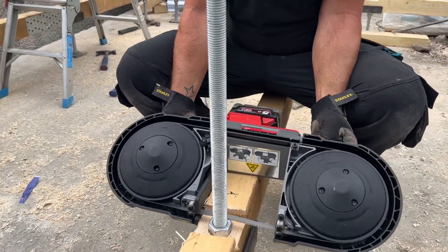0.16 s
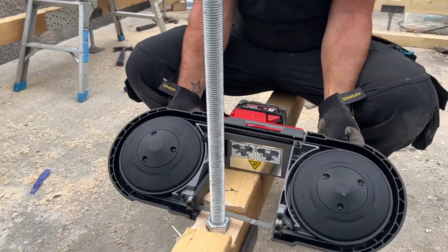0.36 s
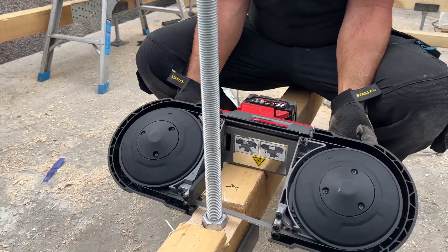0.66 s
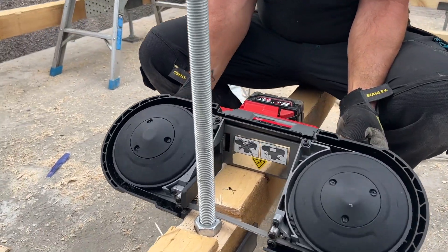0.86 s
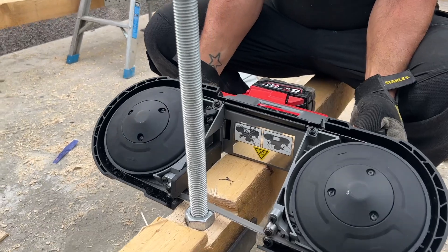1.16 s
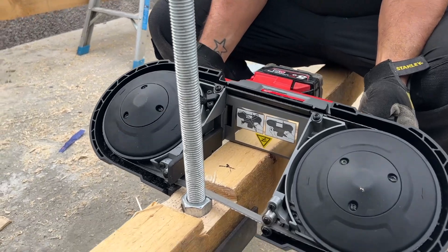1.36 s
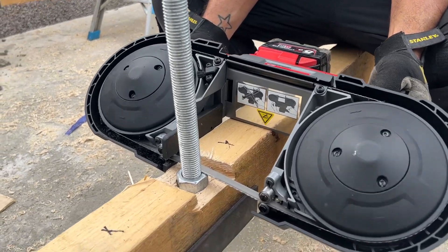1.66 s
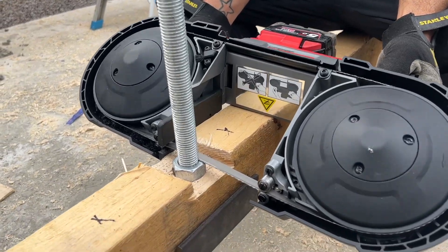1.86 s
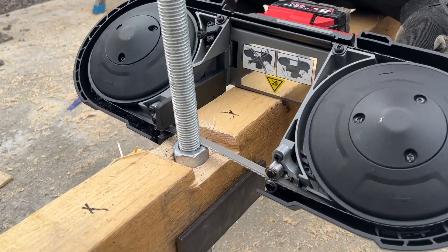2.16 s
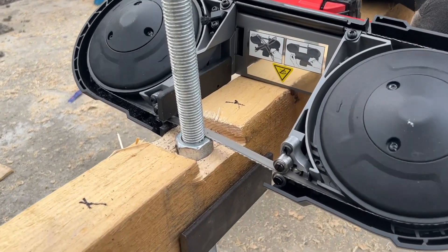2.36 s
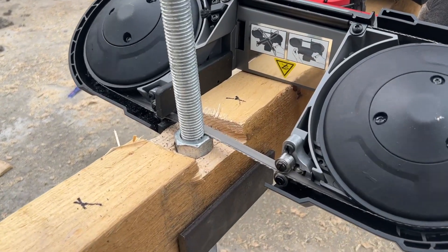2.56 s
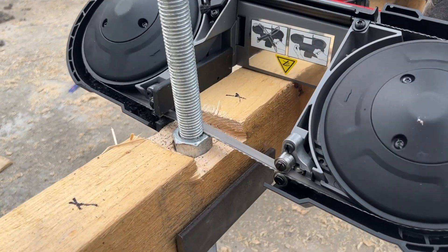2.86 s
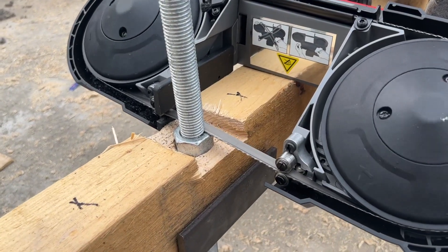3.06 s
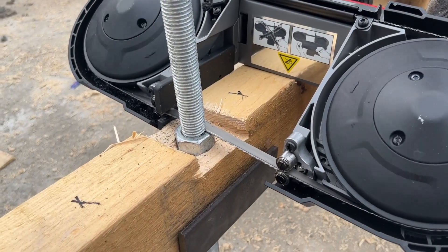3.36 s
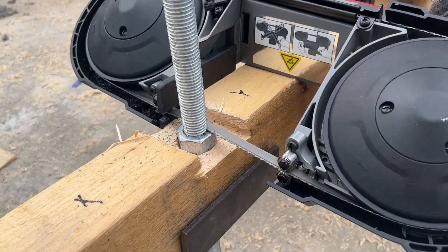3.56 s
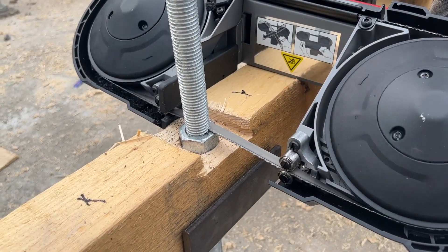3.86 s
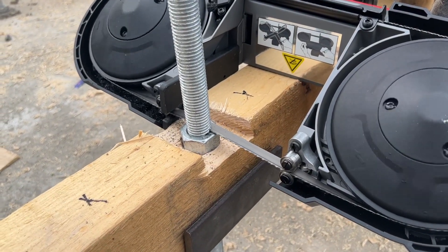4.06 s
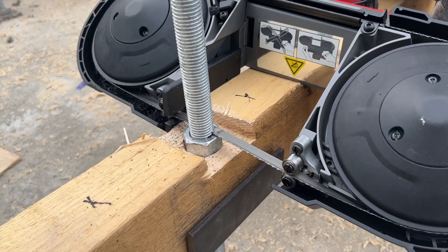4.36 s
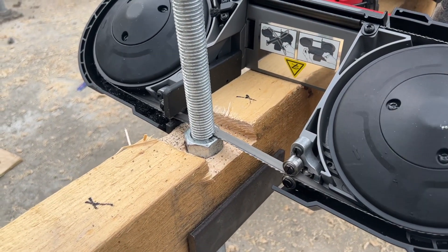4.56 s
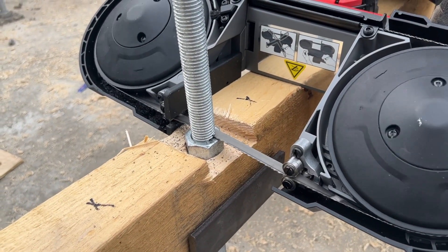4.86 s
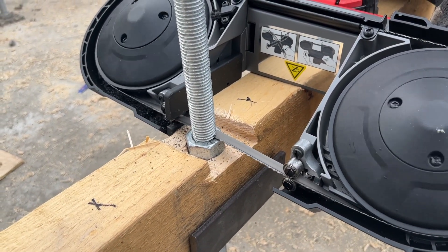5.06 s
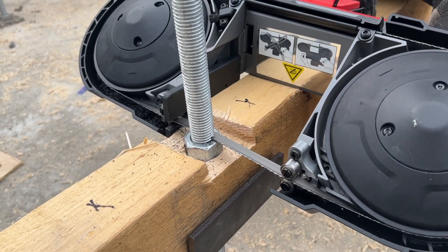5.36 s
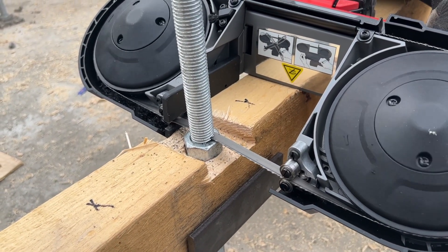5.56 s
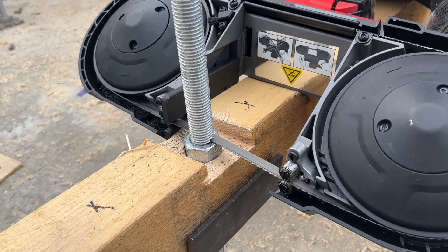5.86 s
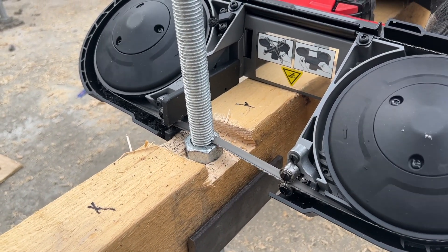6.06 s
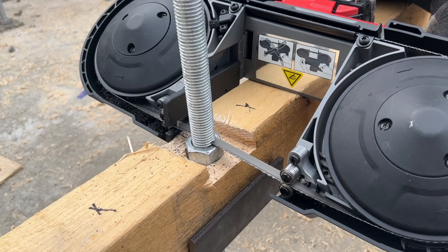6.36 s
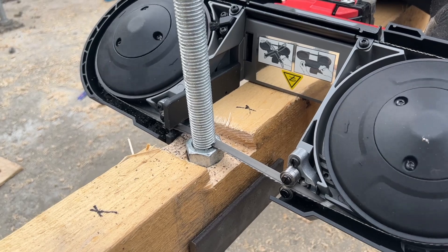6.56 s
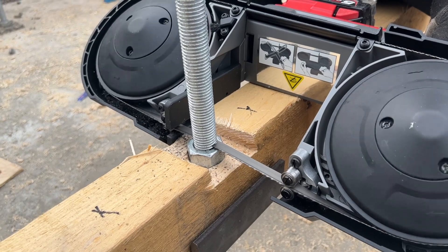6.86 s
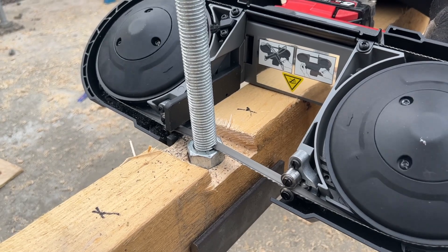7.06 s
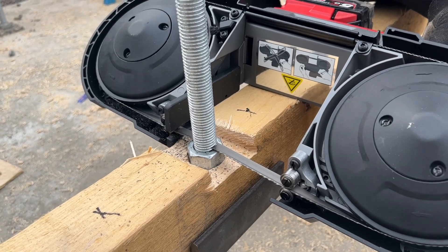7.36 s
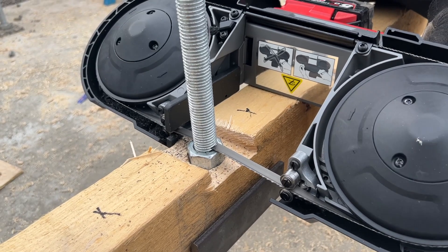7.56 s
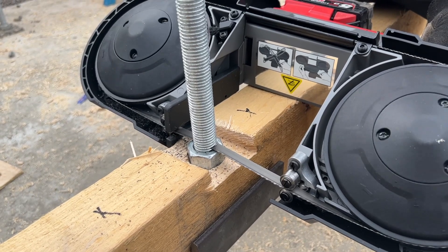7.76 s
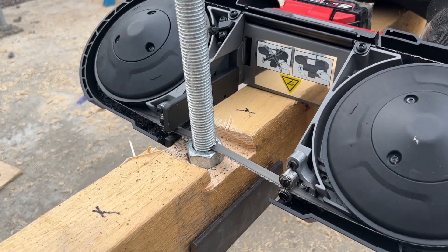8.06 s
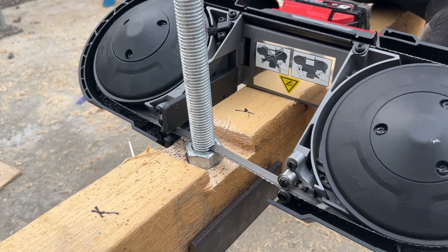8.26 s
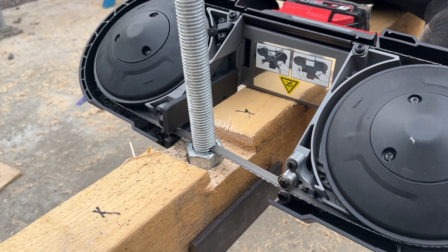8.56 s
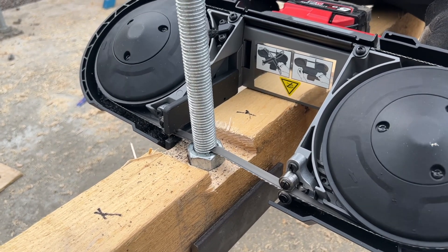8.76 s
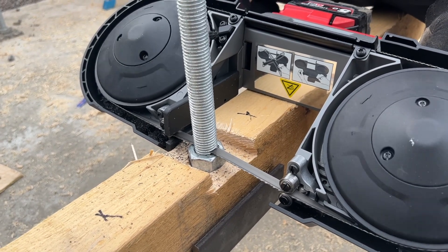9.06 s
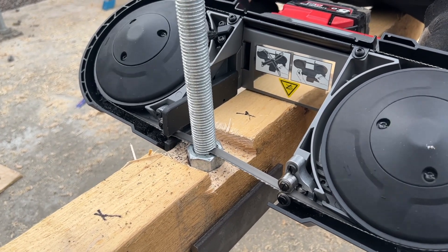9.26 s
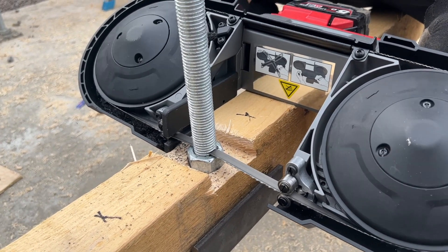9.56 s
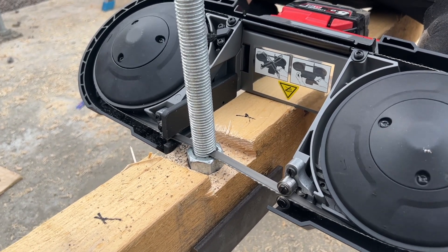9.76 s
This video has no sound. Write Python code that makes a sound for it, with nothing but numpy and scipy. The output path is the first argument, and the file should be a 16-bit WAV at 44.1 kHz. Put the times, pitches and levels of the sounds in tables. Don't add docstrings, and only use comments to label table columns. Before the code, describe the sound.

Close to a mono microphone outdoors, a cordless band saw runs without pause, its steady whine wavering slightly as the blade loops. Teeth rattle the plastic housing and grind a steel rod, the metallic ringing and hiss strengthening after about three seconds. Timber knocks and light taps punctuate the middle, one sharp and hard, with faint wind underneath.

```python
import sys
import numpy as np
from scipy import signal
from scipy.io import wavfile
from scipy.ndimage import uniform_filter1d

SR = 44100
rng = np.random.default_rng(int(sys.argv[2]) if len(sys.argv) > 2 else 0)


def transcribe(u):
    v = np.clip(np.atleast_2d(u).T, -1, 1)
    q = np.round(v * 32767).astype(np.int16)
    wavfile.write(sys.argv[1], SR, q)


def ratio_of_db(decibels):
    return 10 ** (np.asarray(decibels, float) / 20)


N = 437031
TIME = np.arange(N) / SR
SETTLE_S = 0.31


def evened(x):
    return x / np.sqrt(np.mean(x ** 2) + 1e-20)


def columns(rows, t):
    s, *values = np.transpose(rows)
    return [np.interp(t, s, v) for v in values]


def read(points, hz):
    f, value = np.transpose(points)
    return np.interp(np.log(hz + 1), np.log(f + 1), value, -90, -90)


def add(mix, s, sound):
    part = mix[round(s * SR):][:len(sound)]
    part += sound[:len(part)]


def high_passed(x, edge_hz):
    return signal.sosfilt(signal.butter(6, edge_hz, "high", fs=SR, output="sos"), x)


def waver(top_hz):
    low_pass = signal.butter(2, top_hz, fs=SR, output="sos")
    return evened(signal.sosfilt(low_pass, rng.standard_normal(N)))


def ring(x, modes):
    out = np.zeros(N)
    for hz, width_hz, db in modes:
        r = np.exp(-np.pi * width_hz / SR)
        section = [1, 0, -1, 1, -2 * r * np.cos(2 * np.pi * hz / SR), r * r]
        out += ratio_of_db(db) * evened(signal.sosfilt([section, section], x))
    return evened(out)


def struck(modes, rise_s, pitch=1):
    t = np.arange(8000) / SR
    tones = sum(ratio_of_db(db - 60 * t / t60_s) * np.sin(2 * np.pi * hz * pitch * t) for hz, db, t60_s in modes)
    return (1 - np.exp(-t / rise_s)) * tones


def noise(field_db, patchy_db, flicker_db, size):
    hop = size // 4
    frames = N // hop + 5
    hz = np.fft.rfftfreq(size, 1 / SR)
    real, imag, patches = rng.standard_normal((frames, len(hz), 3)).T
    patches = uniform_filter1d(patches, size=8, axis=0)
    patches = evened(uniform_filter1d(patches, size=10, axis=1))
    flicker = evened(uniform_filter1d(rng.standard_normal(frames), size=4))
    db = field_db(hz, np.arange(frames) * hop / SR) + patchy_db * patches + flicker_db * flicker
    return signal.istft((real + 1j * imag) * ratio_of_db(db), nperseg=size, noverlap=size - hop)[1][:N]


def coloured(spectrum, patchy_db, flicker_db, size):
    return evened(noise(lambda hz, t: read(spectrum, hz)[:, None], patchy_db, flicker_db, size))


def cut_depth(t):
    # start_s, depth (0-1)
    depth_points = [(0, 0.), (.5, 0.35), (1.2, 0.36), (2.2, 0.4), (3.2, 0.7), (4.2, 0.57), (5.3, 0.82),
                    (6.3, 0.86), (7.8, 0.84), (9.91, 0.85)]
    return columns(depth_points, t)[0]


def pushes():
    # start_s, length_s, ramp_s, chips_db, rollers_db
    push_rows = [
        (1.6, 1.26, .8, 2, 7),
        (3.0, 0.62, 0.9, 6, 14),
        (3.607, 2.24, .4, 6, 8),
        (5.756, 0.61, .1, 2, 6),
        (6.35, 1.03, 0.45, 9, 6),
        (7.55, 1.5, .6, 5.5, 3),
        (9.64, .27, .08, 13, .1),
    ]
    on = [np.clip(np.minimum(TIME - s, s + length_s - TIME) / ramp_s + .5, 0, 1)
          for s, length_s, ramp_s, *_ in push_rows]
    return np.transpose(push_rows)[3:] @ np.array(on)


def shaft_speed():
    # start_s, shaft_hz (mean)
    mean_speed = [(0, 268.4), (.4, 268.2), (.68, 269.5), (.95, 268.9), (1.3, 270.6), (2.3, 271.1),
                  (2.6, 270.5), (2.95, 271.5), (4.4, 271.9), (6, 271.8), (7, 271.6), (7.7, 270.7),
                  (8.5, 271.9), (9.91, 271.5)]
    loop_drag = [(0.037, -0.66), (0.108, 0.99), (0.155, 0.07), (0.229, 1.77), (0.246, -0.27), (0.349, 0.44),
                 (0.417, -0.9), (0.442, 0.94), (0.525, -0.76), (0.55, 0.65), (0.646, -2.05), (0.663, 0.6),
                 (0.684, -0.49), (0.708, 1.52), (0.729, -2.27), (0.871, 0.51), (0.938, -1.12),
                 (0.962, 1.04)]
    turns_per_lap, drag_hz = 153.6, 1.3
    mean_hz = columns(mean_speed, TIME)[0]
    place = np.cumsum(mean_hz) / SR / turns_per_lap % 1
    return mean_hz + drag_hz * np.interp(place, *np.transpose(loop_drag), period=1), place


def wind():
    # hz, density_db
    wind_colour = [(5, -3), (14, 0), (24, -9), (36, -22), (48, -26)]
    # peak_s, half_width_s, rise_db (above the calm)
    gusts = [
        (.3, .5, 4),
        (1.4, .45, 12),
        (2.3, .5, 9),
        (3.9, .2, 6),
        (9.9, .6, 10),
    ]
    level_db = -72.5 + sum(db * np.exp(-((TIME - s) / width_s) ** 2) for s, width_s, db in gusts)
    return ratio_of_db(level_db) * coloured(wind_colour, patchy_db=1, flicker_db=1, size=8192)


def rumble():
    # hz, density_db
    frame_colour = [(45, -5), (70, -5.5), (160, 1), (210, 1.5), (300, 4.5), (380, 10), (440, 5), (500, -18)]
    return ratio_of_db(-56) * coloured(frame_colour, patchy_db=1.5, flicker_db=2.0, size=2048)


def timber_knocks(out):
    # start_s, peak_db, crack_db (above the thud), pitch_factor
    blows = [(0.549, -35, -20, 1.1), (.93, -36, -23, .9), (4.571, -24, 4, 1.1), (4.582, -25, 4, 0.92),
             (4.589, -35, -8, 1.3), (4.603, -23.5, -4, .97), (4.617, -37, -12, 1.3),
             (5.278, -24, -16, 0.94), (5.289, -22, -18, .95), (5.297, -33, -14, 1.25),
             (5.305, -36, -18, 0.77), (5.346, -31, -20, 1.1), (8.765, -38, -20, 1)]
    # hz, level_db, t60_s
    thud_modes = [(118, -31, .1), (174, -13, 0.088), (277, -6.5, 0.094), (323, -3.5, 0.13),
                  (440, -2, 0.075)]
    # hz, level_db, t60_s
    crack_modes = [(725, -12, .03), (930, -8, 0.03), (1535, -4, 0.036), (2120, -7, 0.032),
                   (3060, -12, .025)]
    for s, db, crack_db, pitch in blows:
        thud = struck(thud_modes, 1 / 600, pitch)
        add(out, s, ratio_of_db(db) * (thud + ratio_of_db(crack_db) * struck(crack_modes, 1 / 2000)))


def hard_blow(out):
    # start_s, crack_db, plank_db
    hits = [
        (5.7246, -6, -11),
        (5.7415, -40, -23),
    ]
    # hz, level_db, t60_s
    crack_modes = [(780, -7, .02), (910, -1.5, .02), (1060, -6, .02)]
    # hz, level_db, t60_s
    plank_modes = [(170, -22, .1), (235, -8, .06), (290, 0, .06)]
    for s, crack_db, plank_db in hits:
        add(out, s, ratio_of_db(crack_db) * struck(crack_modes, 1 / 900))
        add(out, s + 1 / 900, ratio_of_db(plank_db) * struck(plank_modes, 1 / 300))


def taps_and_thumps(out):
    # start_s, peak_db, pitch_hz
    housing_taps = [(0.357, -18, 684), (2.892, -20, 640), (4.339, -24, 664), (4.75, -21, 597),
                    (5.48, -20, 653), (6.03, -17.5, 687), (7.237, -39, 610), (7.728, -16.5, 636),
                    (9.254, -19.5, 640), (9.428, -19, 658)]
    # start_s, peak_db, pitch_hz
    ground_thumps = [(0.949, -43, 85), (2.099, -48.5, 75), (2.68, -51, 72), (3.849, -52, 134),
                     (5.9, -51, 150), (6.66, -55, 140), (6.759, -46, 94.2), (6.798, -43, 80.7),
                     (6.832, -44, 123), (6.926, -51, 152), (6.989, -44, 75), (7.08, -54, 110),
                     (7.199, -41, 62), (7.759, -51, 177), (9.499, -51, 140)]
    for s, db, hz in housing_taps:
        add(out, s, struck([(hz, db - 3.5, .1)], 0.00076))
    for s, db, hz in ground_thumps:
        add(out, s, struck([(hz, db + 2.0, .15)], .008))


def knocks():
    out = np.zeros(N)
    timber_knocks(out)
    hard_blow(out)
    taps_and_thumps(out)
    return out


def rush():
    # hz, density_db
    shallow_colour = [(300, -3), (420, -18), (520, -0.5), (1100, -3.5), (1300, -11.5), (2050, -15),
                      (2700, -13), (4100, -13), (5100, -13), (5800, -14.5), (7500, -19), (9800, -24),
                      (11500, -32), (14000, -43)]
    # hz, density_db
    deep_colour = [(300, -17), (420, -29), (520, 0.5), (1100, -8), (1300, -9.5), (2050, -10), (2700, -8.5),
                   (4100, -15), (5100, -12.5), (5800, -19), (7500, -21), (8400, -30), (11500, -29),
                   (14000, -42)]

    def colour(hz, t):
        deep = np.clip(cut_depth(t), 0, 1)
        return np.outer(read(shallow_colour, hz), 1 - deep) + np.outer(read(deep_colour, hz), deep)

    turns = np.cumsum(shaft_speed()[0]) / SR
    beat = 1 + 0.034 * np.cos(4 * np.pi * turns)
    return ratio_of_db(-33) * beat * evened(noise(colour, patchy_db=1.24, flicker_db=0.43, size=512))


def chips(bite_db):
    # hz, density_db
    chip_colour = [(8000, -30), (10200, -9), (10750, -2), (11500, -5), (12400, -4), (13200, -6), (14000, 0),
                   (14800, -4), (15800, -4)]

    def spray(hz, t):
        fizz_band = np.exp(-((hz - 14000) / 600) ** 2)
        return read(chip_colour, hz)[:, None] - 12 * np.outer(fizz_band, np.clip(1 - t / 8.5, 0, 1))

    level_db = -63.5 + 3.5 * cut_depth(TIME) + pushes()[0] + 1.2 * waver(4) + .4 * bite_db
    return ratio_of_db(level_db) * evened(noise(spray, patchy_db=0.0, flicker_db=0.5, size=256))


def motor():
    strong_multiples = [4, 6, 12, 18, 38.9]
    weak_multiples = [1, 3.6, 7, 8, 10, 13.05, 14.4, 16, 20, 36]
    # level_db, drift_db_per_s (cut and listening angle change), held_db (until the blade settles)
    strong_levels = [(-35, -0.2, -2.5), (-39.5, -0.03, -10), (-41, 0.4441, 6), (-34.5, -0.69, -4.5),
                     (-59.5, -0.14, -4)]
    # level_waver_db, phase_waver_rad, gear_beat_db
    strong_wavers = [(1.3, .12, .3), (1.3, .18, .3), (1.8, .3, .3), (2.4, .45, 1.3), (4.5, .8, .8)]
    # level_db, level_waver_db, phase_waver_rad, gear_beat_db
    weak_tones = [(-62.5, 2.5, .3, .3), (-53, 3.0, .3, .3), (-62, 2.5, .3, .3), (-51, 2.0, .15, .3),
                  (-55, 2.5, .2, .3), (-60, 2.5, .4, .3), (-58, 3.0, .8, .3), (-51.5, 3.5, .2, .3),
                  (-64, 3.0, .3, .3), (-65, 3.0, .3, .3)]
    # hz, width_hz, lift_db
    cover_modes = [(3215, 25, -7.0), (4810, 45, 12.0), (10400, 130, 11.0)]

    speed_hz = shaft_speed()[0] + .45 * waver(22)
    settled_hz = uniform_filter1d(speed_hz, size=2200)
    turns = np.cumsum(speed_hz) / SR
    gear = np.cos(2 * np.pi * .15 * turns)
    strong_tones = [(db + drift_db * TIME + held_db * np.exp(-TIME / SETTLE_S), *wavers)
                    for wavers, (db, drift_db, held_db) in zip(strong_wavers, strong_levels)]
    shake, slip = [waver(59), waver(28)], [waver(50), waver(48)]
    out = np.zeros(N)
    tones = zip(strong_multiples + weak_multiples, strong_tones + weak_tones)
    for i, (multiple, (db, waver_db, phase_rad, gear_db)) in enumerate(tones):
        later = i * 9001
        lift_db = 0
        for hz, width_hz, peak_db in cover_modes:
            if abs(multiple * speed_hz[0] / hz - 1) < 1 / 20:
                offset = (multiple * settled_hz - hz) / width_hz
                lift_db = lift_db + peak_db / (1 + offset ** 2) - peak_db / 2
        level_db = db + lift_db + waver_db * np.roll(shake[i % 2], later) + gear_db * gear
        phase = 2 * np.pi * multiple * turns + phase_rad * np.roll(slip[i % 2], later)
        out += np.sqrt(2) * ratio_of_db(level_db) * np.cos(phase)
    return out


def teeth(per_s, spread_db):
    size = ratio_of_db(spread_db * np.minimum(rng.exponential(1, N), 4))
    return size * rng.choice([-1., 1.], N) * (rng.random(N) < per_s / SR)


def housing():
    # hz, width_hz, level_db
    housing_modes = [(562, 86, 3.5), (655, 62, 3.5), (847, 295, 4), (990, 63, -5)]
    level_db = -35.5 - 0.5 * waver(6.2) - 4.0 * np.exp(-TIME / SETTLE_S)
    return ratio_of_db(level_db) * high_passed(ring(teeth(2500, spread_db=3.0), housing_modes), edge_hz=427)


def cutting(bite_db):
    # hz, width_hz, level_db
    blade_modes = [(4660, 310, 0), (3221, 320, -3), (3640, 410, -11), (2638, 220, -8.5)]
    # hz, width_hz, level_db
    rod_modes = [(2225, 34, -1.5), (2294, 73, -3)]
    # hz, width_hz, level_db
    roller_modes = [(6340, 770, 1), (7720, 1000, -3.5), (6860, 270, -8)]
    # hz, width_hz, level_db
    contact_modes = [(3550, 600, 0), (10900, 25, -33)]
    depth = cut_depth(TIME)
    weld_at, weld_width = 0.556, 0.023
    weld_db = -23 * depth * np.exp(-((shaft_speed()[1] - weld_at) / weld_width) ** 2)

    blade_db = -45.5 + weld_db + 9.8 * depth + 1.56 * bite_db + 0.34 * waver(6)
    rod_db = -63.0 + weld_db + 20.8 * depth + 2.5 * waver(12)
    rollers_db = -61.5 + 10.5 * depth + pushes()[1] + 0.59 * weld_db + 2.0 * bite_db
    contact_db = np.maximum(-39.5 - 5.5 * TIME, -56)

    strikes = teeth(5000, spread_db=0.0)
    out = ratio_of_db(blade_db) * ring(strikes, blade_modes)
    out += ratio_of_db(rod_db) * ring(strikes, rod_modes)
    out += ratio_of_db(rollers_db) * ring(strikes, roller_modes)
    return out + ratio_of_db(contact_db) * ring(strikes, contact_modes)


def scene():
    bite_db = waver(13)
    mono = wind() + rumble()
    mono += high_passed(knocks(), edge_hz=90)
    mono += ratio_of_db(0.12 * bite_db) * high_passed(rush(), edge_hz=455)
    mono += chips(bite_db) + motor() + housing() + cutting(bite_db)
    return np.array([mono, mono])


def roll_off(x):
    return signal.sosfilt(signal.butter(12, 15700, fs=SR, output="sos"), x)


def record(dry):
    power_db = 10 * np.log10(abs(uniform_filter1d(dry[0] ** 2, size=400)) + 1e-12)
    fall_db = TIME * 9.2
    held_peak_db = np.maximum.accumulate(power_db + fall_db) - fall_db
    over_db = np.maximum(held_peak_db + 23.5, 0)
    mix = dry / ratio_of_db(0.48 * uniform_filter1d(over_db, size=200))
    return roll_off(mix)


dry = scene()
out = record(dry)
transcribe(out)
```